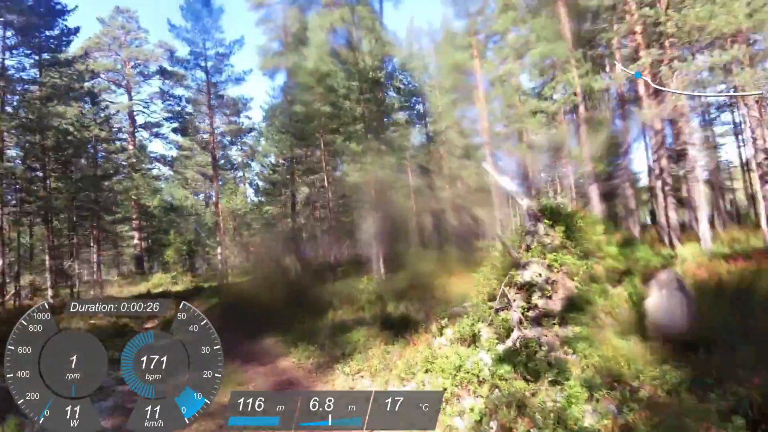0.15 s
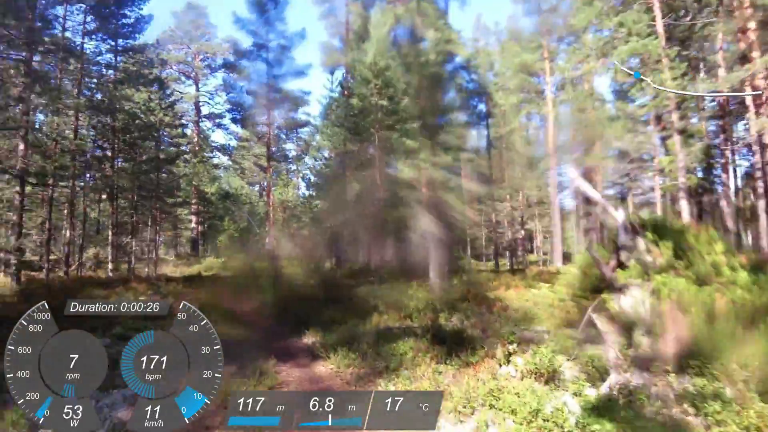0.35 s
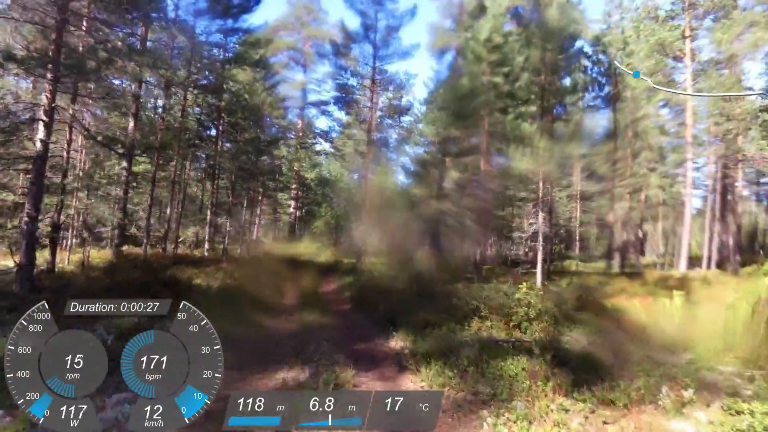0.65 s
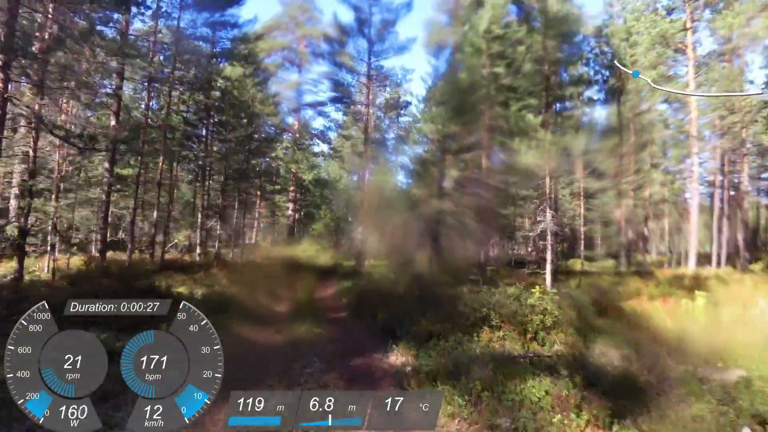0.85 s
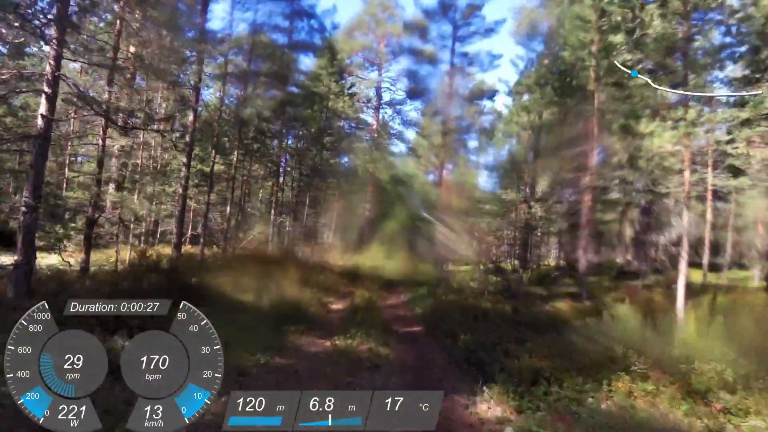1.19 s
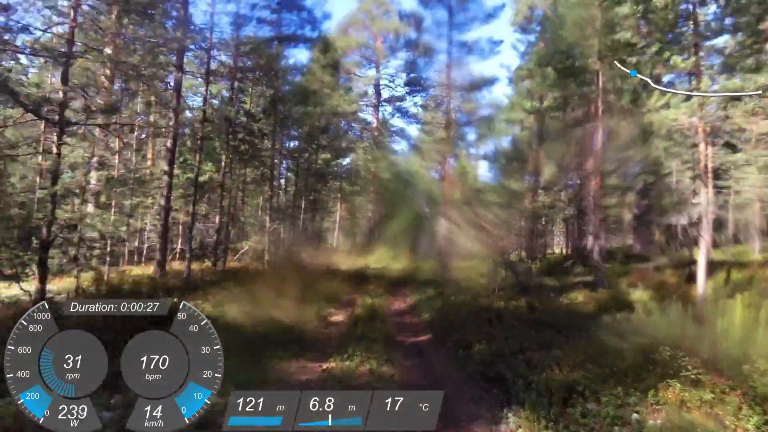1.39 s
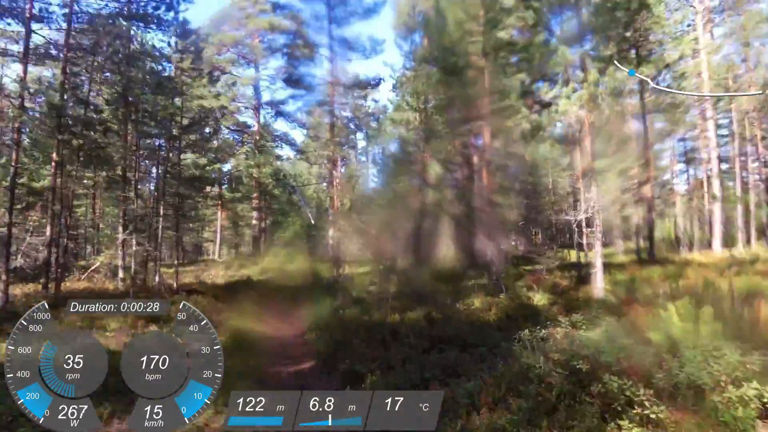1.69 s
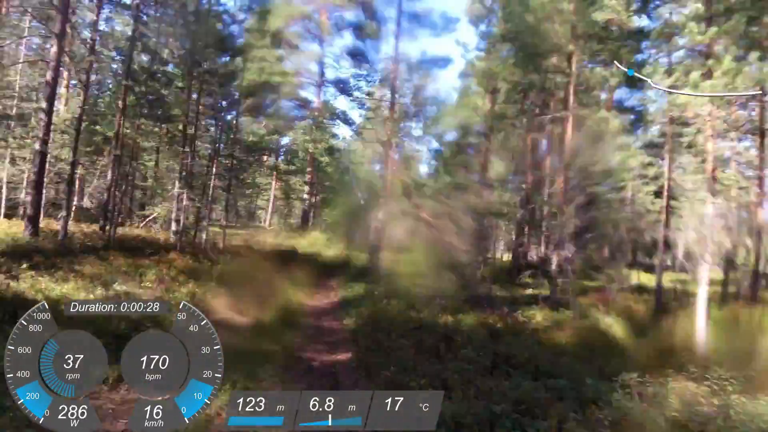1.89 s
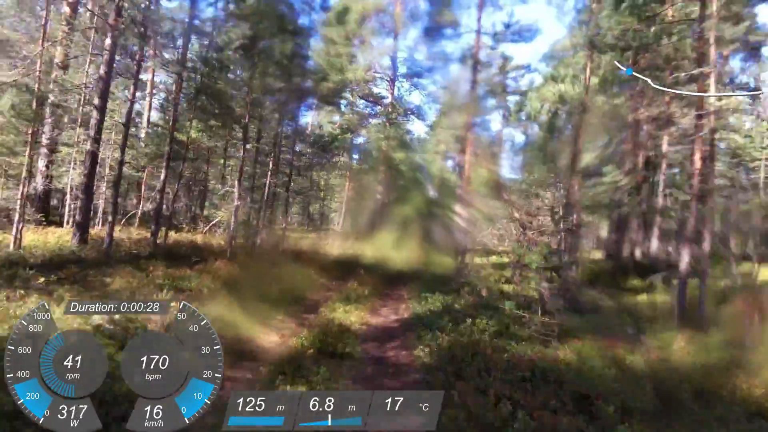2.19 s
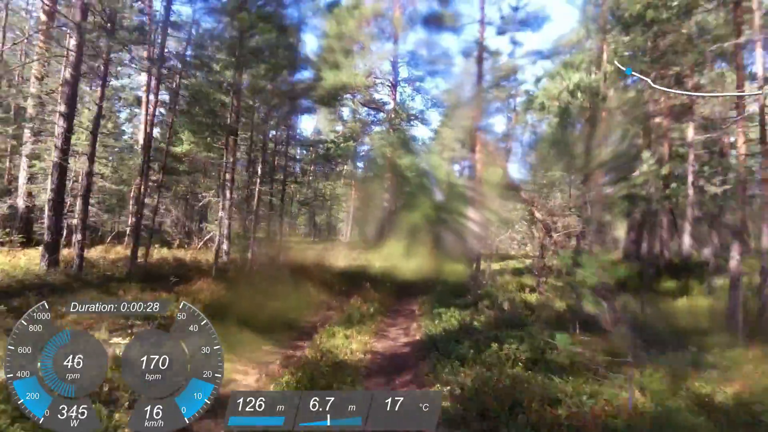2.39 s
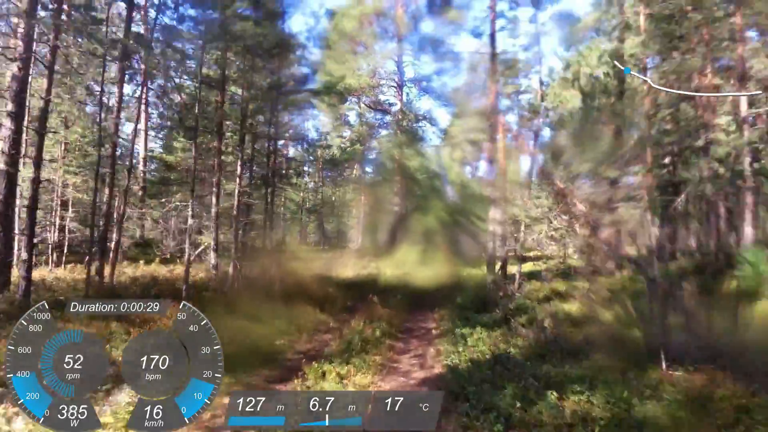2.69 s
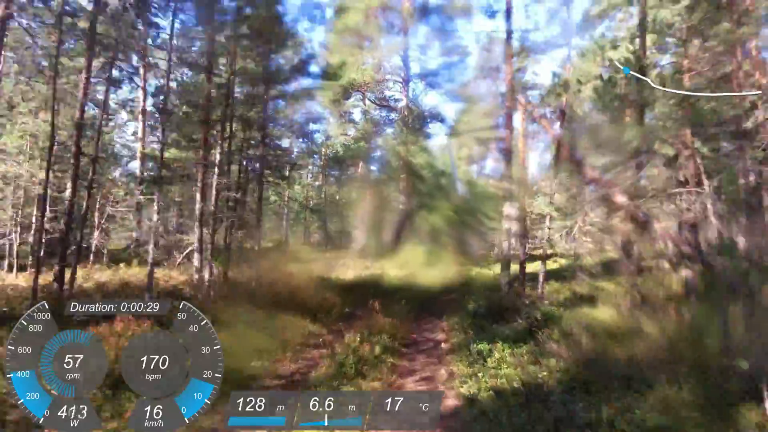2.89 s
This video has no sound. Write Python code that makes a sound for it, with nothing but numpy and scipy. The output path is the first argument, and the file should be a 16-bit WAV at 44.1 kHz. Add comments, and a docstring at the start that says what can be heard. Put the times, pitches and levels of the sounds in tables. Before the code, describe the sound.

A mountain bike thuds and clacks over roots, its tyres rumbling along a trail.

```python
"""A mountain bike rolls over roots on a forest trail, heard from a camera fixed to the bike.
From the start, tyres rumble and hum, wind buffets and small parts tick. The first roots thud through
frame and mount and make chain and fittings clack; then the freewheel buzzes during a short coast.
More bumps follow, the hard ones overloading the microphone, and near the end three blows leave
the brake disc ringing faintly."""
import sys
import numpy as np
from scipy import signal
from scipy.fft import rfft, irfft, next_fast_len
from scipy.io import wavfile

SR = 44100
rng = np.random.default_rng(int(sys.argv[2]) if len(sys.argv) > 2 else 0)


def waveform_to_disk(signal):
    """Save audio, clipped to [-1, 1], as 16-bit WAV at the path in sys.argv[1]."""
    frames = np.transpose(np.atleast_2d(signal))
    scaled = np.clip(frames, -1, 1) * 32767
    samples = np.round(scaled).astype(np.int16)
    wavfile.write(sys.argv[1], SR, samples)


N = 134505

# Levels in the tables are relative; each source applies its own gain.
# course of the rolling noise: time_s, rumble_db, hum_db, grit_db
ROLLING_LEVELS = [(0, -33, -25, -39.5), (0.219, -49, -27.5, -47), (.38, -42.5, -57, -50.5),
                  (0.52, -35, -24, -48), (.6, -26, -24.5, -49), (.86, -31, -28.5, -49.5),
                  (1.049, -26.5, -28, -46), (1.21, -26.5, -28.5, -43.5), (1.328, -28.5, -19.5, -41.5),
                  (1.629, -33.5, -30, -49.5), (1.8, -32.5, -26.5, -44), (2.03, -23.5, -28.5, -43.5),
                  (2.161, -21.5, -27, -42), (2.38, -32, -29.5, -45.5), (2.6, -29, -22.5, -47),
                  (3.05, -35, -20.5, -38)]
# light taps of chain and cables: start_s, level_db, pitch_hz, t60_s
SMALL_TAPS = [(0.08, -29.5, 2260, 0.057), (0.221, -27, 2330, 0.011), (.394, -35.5, 3070, 0.021),
              (1.305, -36.5, 1757, 0.057), (1.4573, -21, 2465, 0.071), (1.522, -30, 3020, 0.13),
              (1.676, -26.5, 3620, 0.061), (1.681, -20, 3200, 0.036), (1.7696, -29.5, 2510, 0.031),
              (1.808, -27, 1935, 0.028), (1.914, -25.5, 2960, 0.017), (2.334, -22, 3500, 0.017),
              (2.409, -14, 3520, 0.016), (2.428, -3.5, 3580, 0.0072), (2.445, -23, 3080, 0.022),
              (2.722, -22, 1940, 0.043)]
# blows that excite the brake disc: start_s, level_db
DISC_BLOWS = [(2.549, -46), (2.649, -40.5), (2.757, -36)]
# a wheel drops into a hollow: start_s, level_db
TYRE_DROPS = [(.132, 1.5), (0.554, -6.5), (0.586, -31.5), (0.746, -13), (0.966, -9.5), (1.254, -10.5),
              (1.503, -1.5), (2.183, -10.5), (2.558, -10)]
# impacts on roots: start_s, thud_db, thud_hz, thud_t60_s, clack_db, clack_hz
ROOT_IMPACTS = [(0.096, -4.5, 185, 0.32, -14.5, 3080), (0.106, 8.5, 394.4, 0.096, -5.5, 2076),
                (.117, 15.5, 342, 0.028, 1.5, 3110), (0.127, 3, 276.4, 0.11, -6.5, 2540),
                (.154, 7, 400.8, 0.16, -2.5, 2030), (0.17, 0.5, 564, 0.086, -8, 1980),
                (.582, -4, 457, 0.036, -4.5, 3050), (0.66, -7.5, 363, 0.044, -26, 2070),
                (0.737, -6, 450, 0.007, -25.5, 3000), (0.746, -2, 453.4, 0.045, -26.5, 3130),
                (0.938, -10.5, 301, 0.075, -24.5, 3040), (0.961, 5, 497, 0.047, -23.5, 2700),
                (1.236, 1.5, 454, 0.13, 1, 2126), (1.248, -2.5, 272, 0.081, -33.5, 2320),
                (1.474, 7.5, 437, 0.047, -3, 3050), (1.487, 7.5, 452.5, 0.053, -4, 1590),
                (1.551, -17, 455, 0.085, -3.5, 3000), (1.692, -5, 542, 0.043, -5.5, 2410),
                (1.722, -2.5, 547, 0.014, -17, 2320), (1.965, -3, 566, 0.043, -12, 2273),
                (2.0182, -1, 511, 0.02, -5.5, 3217), (2.132, -12.5, 470, 0.012, -18, 1660),
                (2.2059, 9.5, 308, 0.018, -1.5, 2444), (2.2216, -8, 508, 0.075, -4.5, 3000),
                (2.267, -2.5, 422, 0.033, -14, 2210), (2.276, -5, 265, 0.034, -29, 2230),
                (2.3135, -6.5, 222.5, .09, -7, 2440), (2.45, -0.5, 397, 0.016, -8.5, 3180),
                (2.484, -2.5, 281.6, 0.079, -6.5, 2173), (2.549, 16.5, 372, 0.051, -3.5, 2627),
                (2.646, 4.5, 492, 0.063, -2.5, 2215), (2.73, -5, 290, 0.037, -28, 2200),
                (2.753, 0.5, 431, 0.065, -1, 3380), (2.854, 3.5, 265, 0.058, -23.5, 2150),
                (2.946, 1, 493.5, 0.05, -3, 2370), (2.957, -18.5, 448, 0.15, -5, 1667)]

# normal modes: frequency_hz, level_db, t60_s
FRAME_MODES = [(420, -31, .35), (474, -30, .35), (581, -31, .35), (705, -32, .35), (1430, -44, .34),
               (1590, -42, .42), (1650, -25, .05), (2130, -40, .15), (2480, -42, .22)]
DISC_MODES = [(3150, -8, .16), (3311, 0, .42), (3350, -8, .3)]

# spectra and transfer curves: frequency_hz, gain_db
RUMBLE_SPECTRUM = [(20, -30), (40, -24.5), (75, -17.5), (105, 5), (135, -2.5), (180, -9.5), (260, -4.5),
                   (400, -39.5)]  # ground and wind
HUM_SPECTRUM = [(150, -20.5), (260, 0), (360, -3.5), (410, 2.5), (490, 4), (620, -1), (720, -4), (850, -15),
                (1100, -26)]  # tyre knobs
GRIT_SPECTRUM = [(600, -0.5), (1100, -16.5), (1600, 7), (1900, -4), (2400, 6.5), (2850, -8), (3400, 3),
                 (4100, -14), (5200, -23.5), (8000, -39), (15000, -59)]  # grit under the tread
TICK_SPECTRUM = [(600, -19), (1700, -1.5), (2500, 11), (3600, -0.5), (4700, -19.5), (6800, -39)]  # small parts
METAL_SPECTRUM = [(200, -41), (600, 8), (1000, -4.5), (1650, -7), (2200, -1.5), (2750, -6.5), (3200, -1.5),
                  (3800, -5), (4700, -26), (6800, -36)]  # chain and fittings
MOUNT_SPECTRUM = [(30, -23), (70, -6.5), (130, -1), (300, 3), (550, 2.5), (850, -6), (1200, -20.5),
                  (2000, -20)]  # camera mount
WHEEL_TO_CAMERA = [(280, -15.5), (400, 1), (490, 4.5), (600, -2.5), (720, -2.5), (1500, -18.5)]
MIC_RESPONSE = [(20, -16), (62, 0), (3000, 0), (5000, -.5), (8000, -4), (12000, -6), (16000, -11)]

COAST_START_S, COAST_END_S, COAST_FADE_S, COAST_T60_S, COAST_DB = 0.16, 0.565, 0.04, 5.7, -19
PAWLS_PER_S, PAWL_JITTER, PAWL_SCRAPE = 59.3, 0.0535, 0.022
METAL_RISE_S, CLACK_HOLD_S, CLACK_T60_S = 0.00058, 0.0026, 0.023
LINKS_PER_S, CLATTER_T60_S, CLATTER_GAIN_DB = 1500, 0.09, -22
BUMP_RISE_S, FRAME_GAIN_DB, TICK_GAIN_DB = 0.0054, 5, 0.5
THUD_SAG, THUD_SAG_S = 0.1142, 0.0144  # the pitch starts this share high and sinks as far below


def amp(db):
    """Amplitude grows tenfold for every 20 dB."""
    return 10 ** (np.asarray(db) / 20)


def unit(x):
    """Normalisation to an rms of 1."""
    return x / np.sqrt(np.mean(x ** 2) + 1e-20)


def add(mix, start_s, sound):
    """Superposition: a sound sums into the mix from start_s on."""
    part = mix[max(round(start_s * SR), 0):][:len(sound)]
    part += sound[:len(part)]


def colour(x, curve, skirt_db_per_octave=30):
    """Linear filtering by a gain curve that rolls off above its last point."""
    hz, db = np.transpose(curve)
    size = next_fast_len(len(x))
    octave = np.log2(np.fft.rfftfreq(size, 1 / SR) + 1)
    skirt_db = skirt_db_per_octave * np.maximum(octave - np.log2(hz[-1]), 0)
    gain = amp(np.interp(octave, np.log2(hz), db) - skirt_db)
    return irfft(rfft(x, size) * gain, size)[:len(x)]


def noise(spectrum, size):
    """Filtered white noise takes on the filter's spectrum; rms 1."""
    return unit(colour(rng.standard_normal(size), spectrum))


def drift(rate_hz):
    """Low-passed noise wanders at rates up to about rate_hz; rms 1."""
    rolloff = 1 + (np.fft.rfftfreq(N, 1 / SR) / rate_hz) ** 4
    return unit(irfft(rfft(rng.standard_normal(N)) / rolloff, N))


def fade(t, t60):
    """Damping: an exponential decay of 60 dB in t60 seconds."""
    return np.exp(-np.log(1000) * t / t60)


def ring(modes):
    """Free vibration: a struck body sounds as a sum of damped normal modes."""
    t = np.arange(SR // 2) / SR
    return sum(rng.choice([-1, 1]) * amp(db) * fade(t, t60) * np.sin(2 * np.pi * hz * t)
               for hz, db, t60 in modes)


def flutter(spectrum, rate_hz, depth_db):
    """Amplitude modulation: uneven ground makes the level of a noise waver."""
    return unit(noise(spectrum, N) * amp(depth_db * drift(rate_hz)))


def rolling():
    """Random excitation: ground and wind rumble, tyre knobs hum, grit crunches under the tread."""
    times, *levels = np.transpose(ROLLING_LEVELS)
    rumble_db, hum_db, grit_db = (np.interp(np.arange(N) / SR, times, db) for db in levels)
    rumble = amp(rumble_db + 1.5) * flutter(RUMBLE_SPECTRUM, rate_hz=14, depth_db=2)
    grit = amp(grit_db - 4.5) * flutter(GRIT_SPECTRUM, rate_hz=70, depth_db=3.4)
    hum = amp(hum_db - 3.5) * flutter(HUM_SPECTRUM, rate_hz=12, depth_db=1)
    return rumble + hum + grit


def freewheel(t60_scale=0.42):
    """Forced vibration: during the coast, clicking and scraping pawls drive the frame's modes."""
    t = np.arange(N) / SR
    teeth_passed = np.cumsum(PAWLS_PER_S * (1 + PAWL_JITTER * drift(rate_hz=21.27))) / SR
    clicks = np.diff(np.floor(teeth_passed), prepend=0)
    force = clicks + PAWL_SCRAPE * rng.standard_normal(N)
    impulse_response = ring([(hz, db, t60 * t60_scale) for hz, db, t60 in FRAME_MODES])
    buzz = unit(colour(signal.oaconvolve(force, impulse_response)[:N], WHEEL_TO_CAMERA))
    gate = np.clip(np.minimum(t - COAST_START_S, COAST_END_S - t) / COAST_FADE_S, 0, 1)
    return amp(COAST_DB) * fade(t - COAST_START_S, COAST_T60_S) * gate * buzz


def tick(hz, t60):
    """A light impact: a small part vibrates at a high pitch and is soon damped."""
    t = np.arange(SR // 10) / SR
    vibration = 0.55 * np.sin(2 * np.pi * hz * t) + 0.8 * noise(TICK_SPECTRUM, len(t))
    return np.minimum(t / METAL_RISE_S, 1) * fade(t, t60) * vibration


def chain_clatter():
    """Shot noise: links settle in a dense, dying shower of tiny collisions."""
    t = np.arange(SR // 2) / SR
    clicks = rng.standard_normal(len(t)) * (rng.random(len(t)) < LINKS_PER_S / SR)
    return np.minimum(t / BUMP_RISE_S, 1) * fade(t, CLATTER_T60_S) * unit(colour(clicks, METAL_SPECTRUM))


def tyre_thump(hz=128.7, rise_s=0.007, t60=0.13):
    """A damped spring: the tyre squashes and rebounds with a soft, low boom."""
    t = np.arange(SR // 2) / SR
    return np.minimum(t / rise_s, 1) * fade(t, t60) * np.sin(2 * np.pi * hz * t)


def clack(hz):
    """Hard contact excites high modes: metal on metal gives one bright tone within a cluster."""
    t = np.arange(SR // 8) / SR
    chime = 0.44 * np.sin(2 * np.pi * hz * t) + 0.36 * noise(METAL_SPECTRUM, len(t))
    return np.minimum(t / METAL_RISE_S, 1) * fade(np.maximum(t - CLACK_HOLD_S, 0), CLACK_T60_S) * chime


def mount_thud(hz, t60):
    """Damped oscillation: the camera mount swings at one sinking pitch among many blurred modes."""
    t = np.arange(SR // 4) / SR
    pitch_hz = hz * (1 - THUD_SAG + 2 * THUD_SAG * np.exp(-t / THUD_SAG_S))
    swing = 0.62 * np.sin(2 * np.pi * np.cumsum(pitch_hz) / SR) + 0.37 * noise(MOUNT_SPECTRUM, len(t))
    return np.minimum(t / BUMP_RISE_S, 1) * fade(np.maximum(t - BUMP_RISE_S, 0), t60) * swing


def bumps():
    """Impulsive excitation: roots jolt mount, fittings, frame and chain; tyres, taps and disc join in."""
    mix = np.zeros(N)
    for start_s, thud_db, thud_hz, thud_t60, clack_db, clack_hz in ROOT_IMPACTS:
        add(mix, start_s, amp(thud_db) * mount_thud(thud_hz, thud_t60))
        add(mix, start_s, amp(clack_db) * clack(clack_hz))
        add(mix, start_s, amp(clack_db + FRAME_GAIN_DB) * ring(FRAME_MODES))
        # hard, long bumps shake the chain most
        shake = amp((thud_db + clack_db) / 2 + CLATTER_GAIN_DB) * min(2 * thud_t60 / CLATTER_T60_S, 1)
        add(mix, start_s, shake * chain_clatter())
    for start_s, db in TYRE_DROPS:
        add(mix, start_s, amp(db) * tyre_thump())
    for start_s, db, hz, t60 in SMALL_TAPS:
        add(mix, start_s, amp(db + TICK_GAIN_DB) * tick(hz, t60))
    for start_s, db in DISC_BLOWS:
        add(mix, start_s, amp(db) * ring(DISC_MODES))
    return mix


def scene():
    """Superposition of all the bike's sources, in mono."""
    return (bumps() + rolling() + freewheel())[None]


def record(dry):
    """Saturation: the microphone flattens hard knocks, then dulls the treble and limits the band."""
    ceiling, knee, cutoff_hz = 0.565, 10, 16100
    clipped = dry[0] / (1 + abs(dry[0] / ceiling) ** knee) ** (1 / knee)
    low_pass = signal.firwin(255, cutoff_hz, window=("kaiser", 9), fs=SR)
    return signal.oaconvolve(colour(clipped, MIC_RESPONSE), low_pass, "same")[None]


dry = scene()
out = record(dry)
waveform_to_disk(out)
```